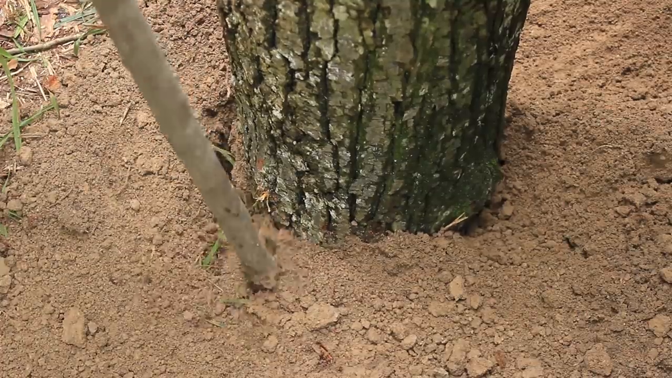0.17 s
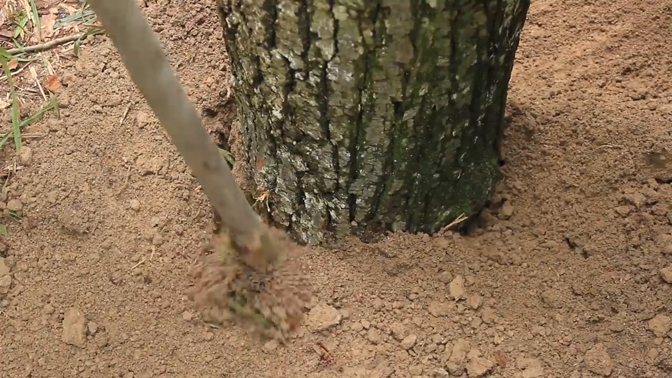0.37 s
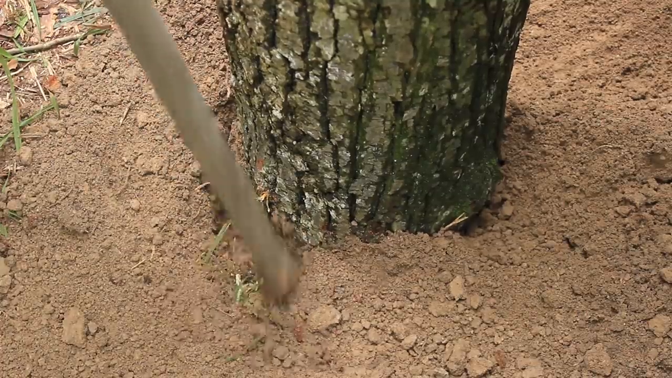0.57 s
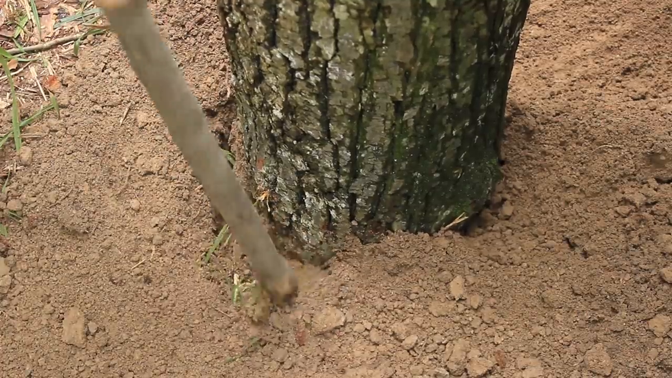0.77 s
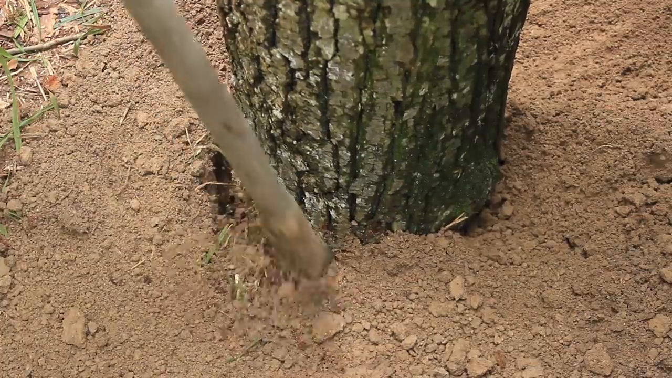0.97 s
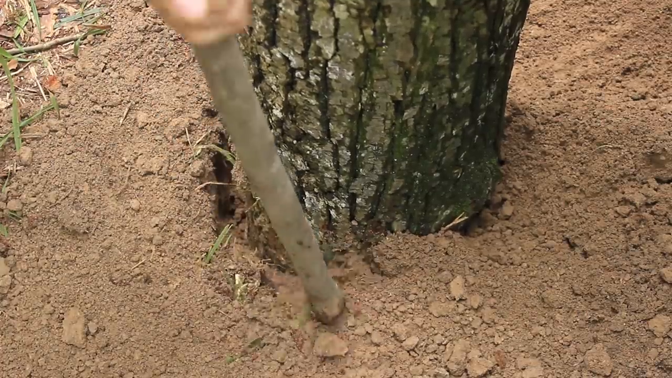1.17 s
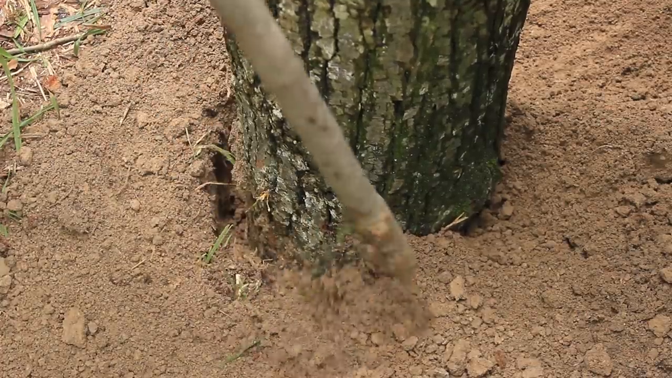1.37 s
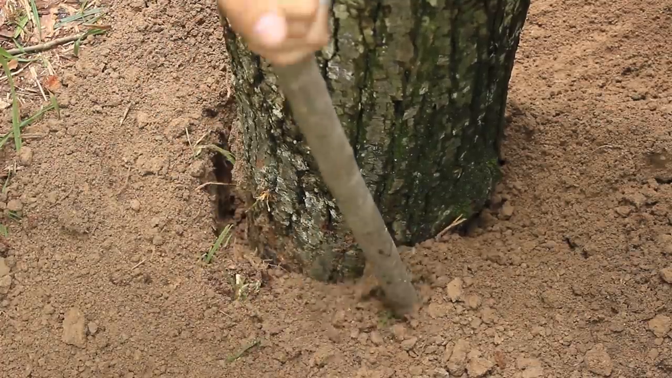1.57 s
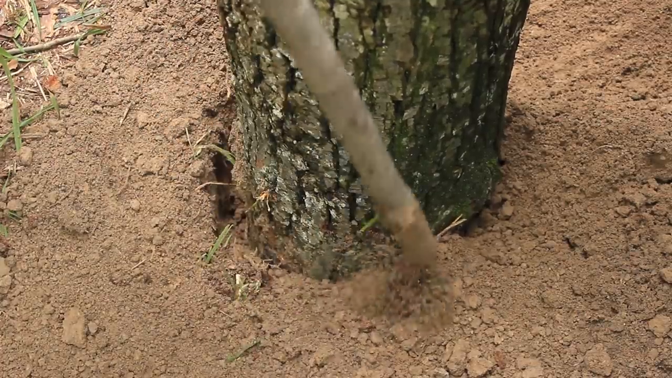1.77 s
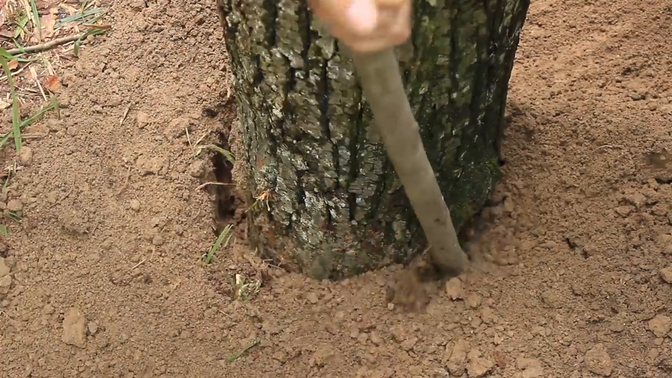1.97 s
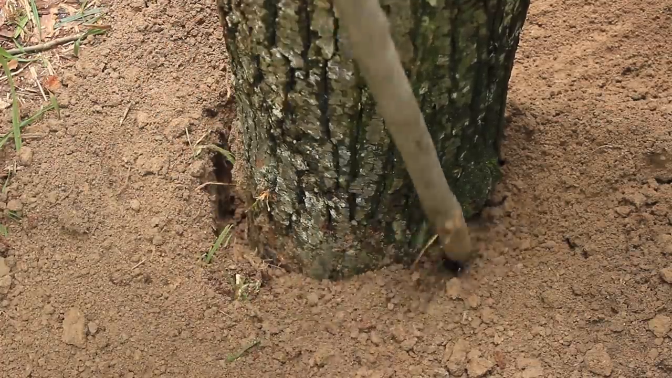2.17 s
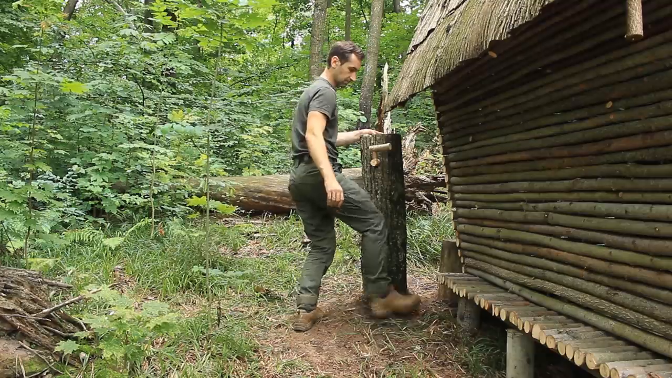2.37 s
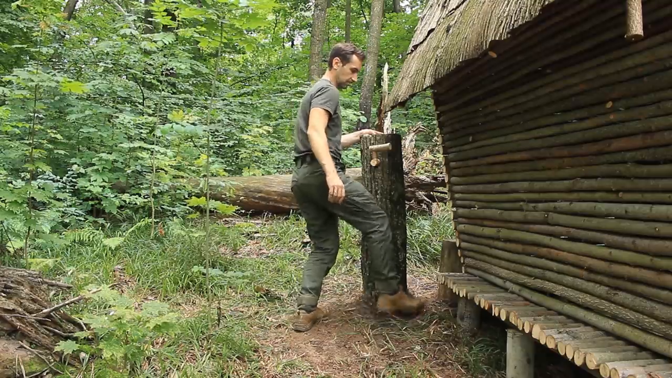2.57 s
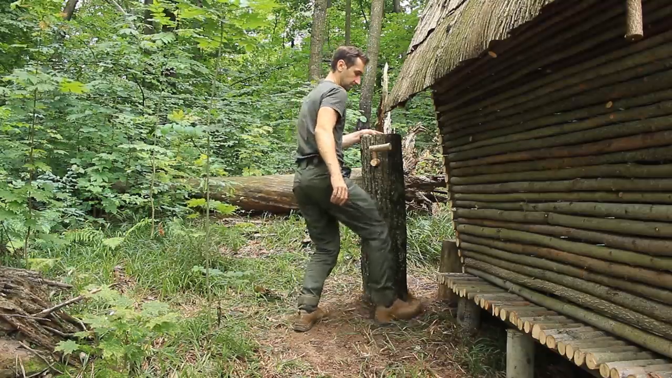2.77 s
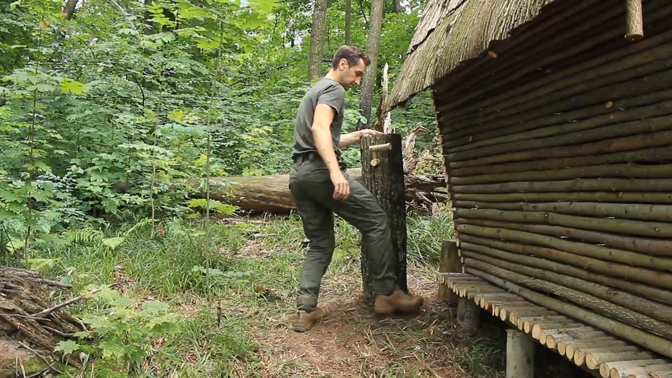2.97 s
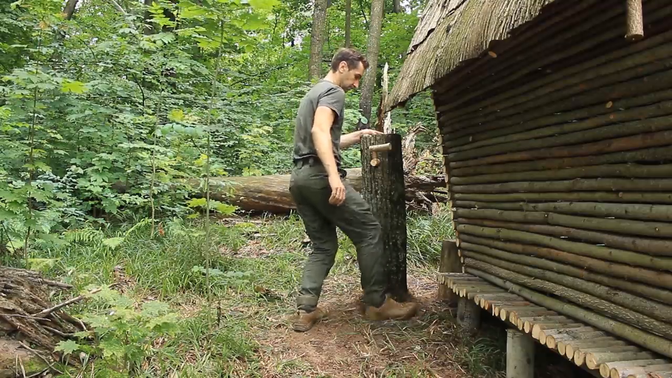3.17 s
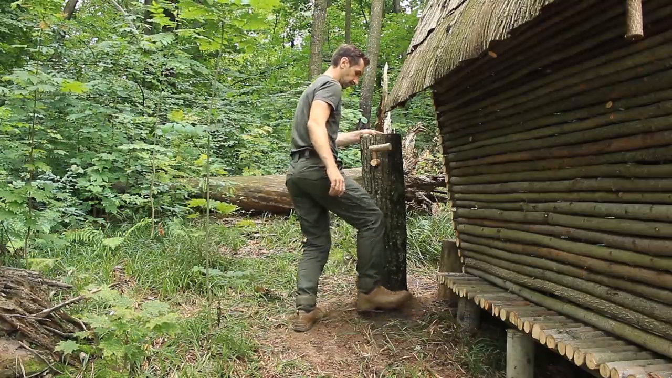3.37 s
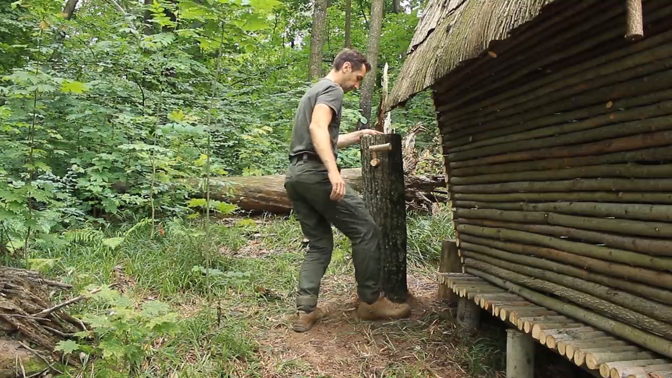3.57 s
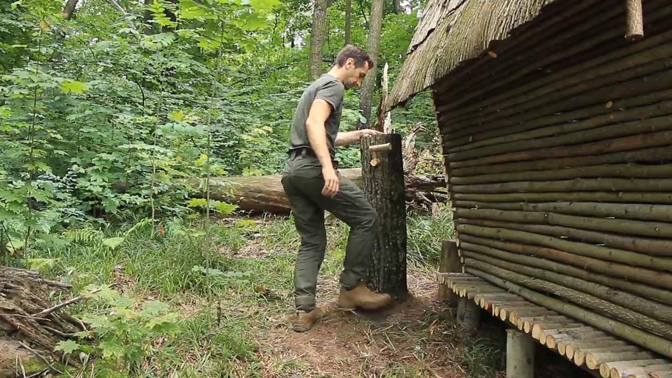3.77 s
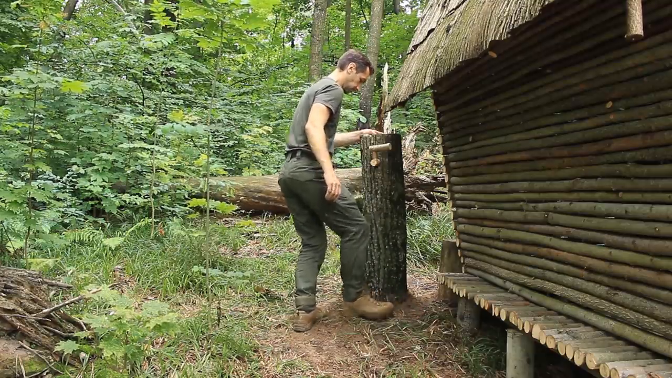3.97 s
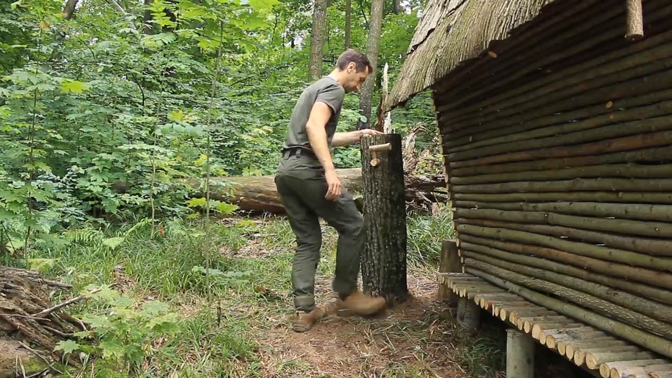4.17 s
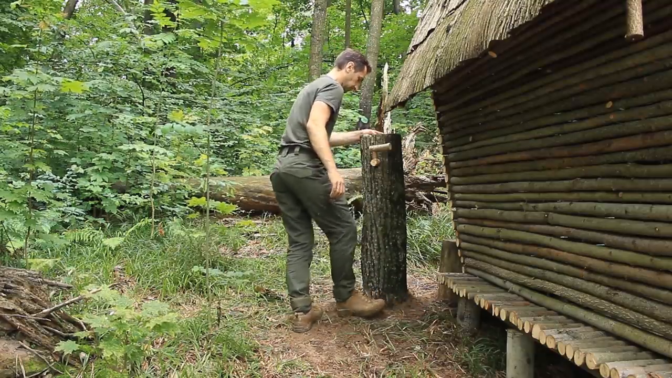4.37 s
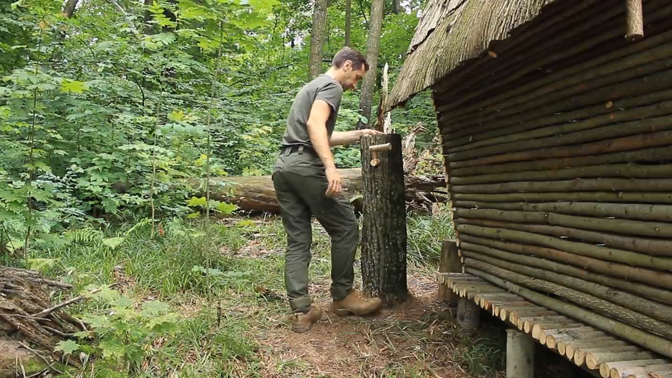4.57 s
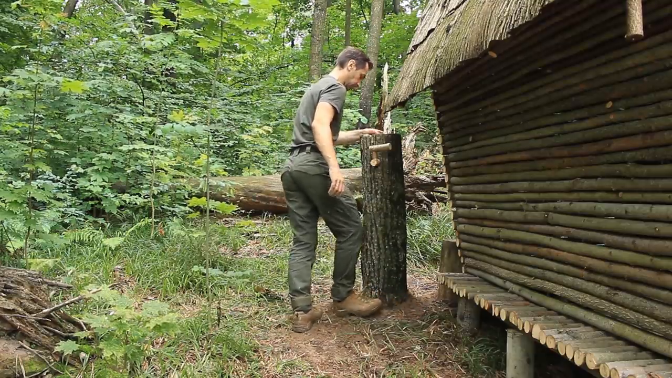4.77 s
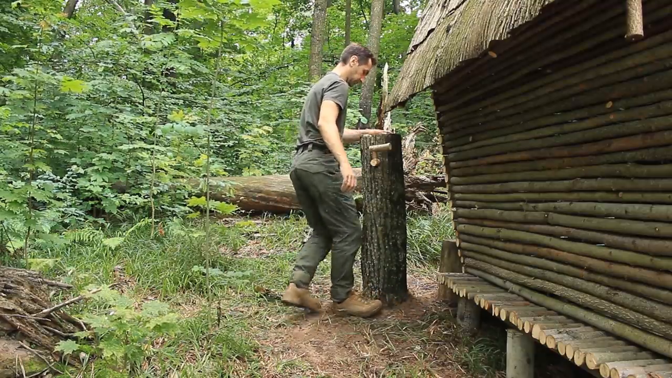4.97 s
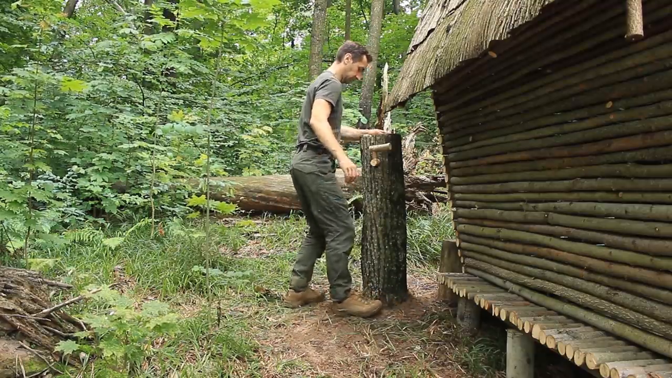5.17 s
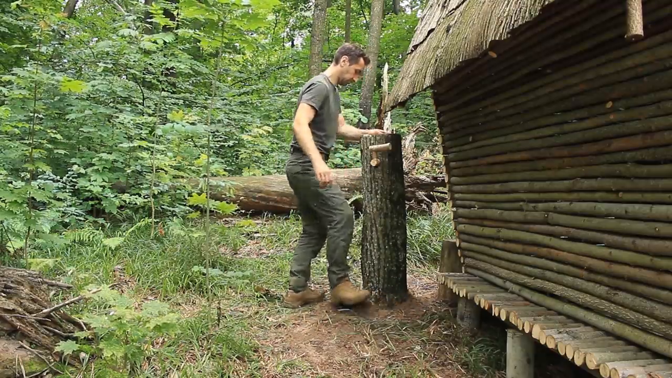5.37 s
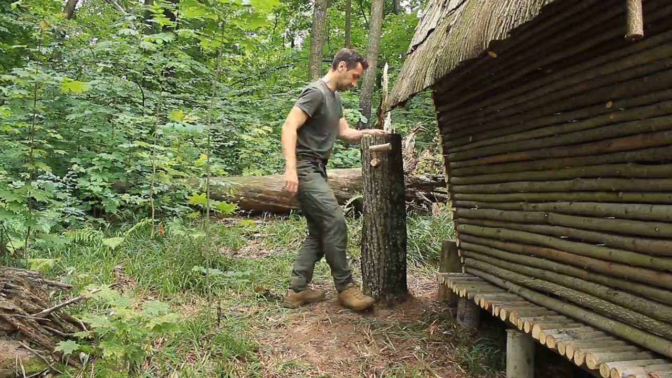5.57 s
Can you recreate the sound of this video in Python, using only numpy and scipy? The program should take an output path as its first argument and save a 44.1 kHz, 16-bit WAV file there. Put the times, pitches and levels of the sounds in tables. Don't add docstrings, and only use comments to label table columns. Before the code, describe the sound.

In a quiet wood, a pole tamps loose earth beside a log, very close: five hollow, gritty knocks, with soil sliding between them. At about 2.3 seconds the view jumps farther back; a boot stamps soil with duller, quieter thuds while a songbird sings a bright trill, falling sweeps and a buzz. Leaves hiss and low wind rumble shakes the single microphone.

```python
import sys
import numpy as np
from scipy import signal
from scipy.io import wavfile
from scipy.ndimage import uniform_filter1d

SR = 44100
rng = np.random.default_rng(int(sys.argv[2]) if len(sys.argv) > 2 else 0)


def linear_from_db(decibels):
    return 10 ** (np.asarray(decibels, float) / 20)


def store_pcm(level_fs):
    pcm = np.round(np.clip(level_fs, -1, 1) * 32767).astype(np.int16)
    wavfile.write(sys.argv[1], SR, np.atleast_2d(pcm).T)


N = 247842

SCENE_CHANGE_S = 2.274

# (frequency [Hz], width [Hz], level [dB])
POLE_MODES = [(508, 55, 3.5), (690, 190, 11), (980, 210, 6), (1300, 72, 6), (1810, 410, 8.5),
              (2506, 92, 1.5), (3400, 310, -16)]


def rms_one(x):
    return x / np.sqrt(np.mean(x ** 2) + 1e-20)


def in_time(rows):
    s, *columns = np.transpose(rows)
    return [np.interp(np.arange(N) / SR, s, column) for column in columns]


def drift(rate_hz):
    r = np.exp(-80 * np.pi * rate_hz / SR)
    white = rng.standard_normal(N // 40 + 2002)
    slow = signal.lfilter([1], [1, -2 * r, r * r], white)[2000:]
    return np.interp(np.arange(N) / 40, np.arange(len(slow)), rms_one(slow))


def add(out, s, sound):
    i = round(s * SR)
    out[i:i + len(sound)] += sound[:N - i]


def band(x, low_hz, high_hz):
    edges_hz = [low_hz, min(high_hz, .45 * SR)]
    return signal.sosfilt(signal.butter(2, edges_hz, "band", fs=SR, output="sos"), x)


def resonate(x, hz, width_hz):
    r = np.exp(-np.pi * width_hz / SR)
    zeros = np.sqrt((1 - r * r) / 2) * np.array([1, 0, -1])
    poles = [1, -2 * r * np.cos(2 * np.pi * hz / SR), r * r]
    return signal.lfilter(zeros, poles, x)


def banded_noise(spectrum, patchy_db):
    hz_points, db_points = np.transpose(spectrum)
    edges_hz = 15 * 2 ** np.arange(0, 10.3, .5)
    white = rng.standard_normal((2, N))
    out = 0
    for k, (low_hz, high_hz) in enumerate(zip(edges_hz, edges_hz[1:])):
        log_centre = np.log(low_hz * high_hz) / 2
        level_db = np.interp(log_centre, np.log(hz_points), db_points, left=-99, right=-99)
        if level_db > -90:
            flicker = linear_from_db(level_db + patchy_db * drift(12.0))
            out = out + flicker * band(white[k % 2], low_hz, high_hz)
    return rms_one(out)


def among_trees(x, t60, wet_db, onset_s):
    t = np.arange(SR) / SR
    tail = rng.standard_normal(SR) * linear_from_db(-60 * t / t60) * (1 - np.exp(-t / onset_s))
    return linear_from_db(wet_db) * signal.fftconvolve(x, tail / np.sqrt(np.sum(tail ** 2)))[:N]


def tamping(hits, modes, thud_hz, grit_hz, thud_db, uneven_db, gain_db, rise_share):
    thud_loss_db_per_octave = 4.5
    grit_lag = 2.6
    skirt = 8.9
    out = np.zeros(N)
    t = np.arange(SR // 4) / SR
    for s, peak_db, high_db, ring_hz, t60 in hits:
        rise_s = rise_share * t60
        low_db = thud_db - thud_loss_db_per_octave * np.log2(ring_hz / 1000)
        pressure = np.minimum(t / rise_s, 1) ** 2 * linear_from_db(-60 * np.maximum(t - rise_s, 0) / t60)
        fine = rng.standard_normal(len(t)) * pressure
        spray = fine * np.minimum(t / (grit_lag * rise_s), 1)
        coarse = fine * linear_from_db(uneven_db * np.minimum(rng.exponential(1, len(t)), 4))

        strengths_db = rng.normal(0, 2.5, len(modes))
        body = linear_from_db(12.0) * resonate(coarse, ring_hz, 0.25 * ring_hz)
        for (hz, width_hz, db), strength_db in zip(modes, strengths_db):
            body = body + linear_from_db(db + strength_db) * resonate(coarse, hz, width_hz)
        body = band(body, 245, min(skirt * ring_hz, 6750))
        thud = band(coarse, *thud_hz)
        grit = band(spray, *grit_hz)
        body, thud, grit = [v / np.max(np.abs(v)) for v in (body, thud, grit)]
        add(out, s, linear_from_db(peak_db + gain_db) * (body + linear_from_db(low_db) * thud + linear_from_db(high_db) * grit))
    return out


def pole_blows():
    # (time [s], peak [dB], grit re body [dB], loudest ring [Hz], t60 [s])
    pole_hits = [(.228, -29, -20, 1050, 0.17), (.250, -18, -18.5, 3400, 0.053),
                 (.259, -21, -26, 1300, 0.029), (.266, -25.5, -10, 800, 0.035),
                 (.662, -29, -19, 2400, 0.061), (.668, -23, -26, 530, 0.047), (.677, -24, -23, 2400, 0.031),
                 (.682, -17.5, -12, 1300, 0.044), (.691, -14.5, -35, 1300, 0.048),
                 (.709, -39, -2, 3380, 0.043), (1.116, -33.5, -23, 1190, 0.072),
                 (1.128, -29, -22, 695, 0.062), (1.144, -25, -24, 2500, 0.046),
                 (1.146, -29, -14, 570, 0.059), (1.535, -32, -41, 2320, 0.025),
                 (1.545, -34, -17, 1230, 0.082), (1.558, -30, -27.5, 1280, 0.066),
                 (1.573, -29.5, -21, 2680, 0.055), (1.972, -27, -15, 2450, 0.036),
                 (1.981, -29, -10.5, 1030, 0.044), (1.997, -22, -18, 980, 0.087),
                 (2.003, -23.5, -22, 800, 0.048), (2.010, -39, -25, 830, 0.076),
                 (2.017, -24, -24, 2500, 0.037)]
    return tamping(pole_hits, POLE_MODES, (210, 580), (3800, 11000),
                   thud_db=-8.5, uneven_db=4.5, gain_db=2.5, rise_share=0.0736)


def crunches():
    # (time [s], hold [s], peak [dB], loudest ring [Hz], grit re body [dB])
    clods = [(0.2505, 0.0073, -27.5, 3300, -23), (0.2572, 0.011, -19.5, 1300, -32),
             (0.658, 0.0065, -37, 2400, -22), (0.6715, 0.0044, -10, 2330, -27),
             (0.703, .007, -25, 3600, -3), (0.856, .004, -42, 2600, -2), (1.107, 0.0065, -29, 2680, -26),
             (1.1396, 0.0042, -10, 1880, -30), (1.534, 0.0044, -26, 2300, -27),
             (1.9677, 0.0026, -33.5, 2500, -12), (4.287, 0.0025, -25, 3200, -1)]
    release_s, uneven_db = 0.0086, 2
    ring_share = 0.23
    dust_db = -13
    out = np.zeros(N)
    t = np.arange(SR // 20) / SR
    for s, hold_s, peak_db, ring_hz, high_db in clods:
        pressure = np.minimum(t / .0007, 1) * linear_from_db(-60 * np.maximum(t - hold_s, 0) / release_s)
        grains = rng.standard_normal(len(t)) * pressure
        grains = grains * linear_from_db(uneven_db * np.minimum(rng.exponential(1, len(t)), 3))
        body = resonate(grains, ring_hz, ring_share * ring_hz)
        body = body + linear_from_db(-20.5) * resonate(grains, 1.4 * ring_hz, 600)
        body = body + linear_from_db(-8) * resonate(grains, 0.51 * ring_hz, 300)
        grit = band(grains, 4000, 7100) + linear_from_db(dust_db) * grains
        body, grit = [v / np.max(np.abs(v)) for v in (body, grit)]
        add(out, s, linear_from_db(peak_db) * (body + linear_from_db(high_db) * grit))
    return out


def pushes():
    # (time [s], peak [dB], frequency [Hz])
    landings = [
        (0.6723, -11.5, 510),
        (.683, -20, 526),
        (1.141, -15, 520),
        (1.148, -26, 282),
        (2.507, -25, 285),
        (3.246, -39, 304),
        (4.273, -24.5, 256),
        (5.594, -32, 297),
    ]
    cycles = 9.9
    out = np.zeros(N)
    t = np.arange(SR // 20) / SR
    for s, peak_db, hz in landings:
        add(out, s, linear_from_db(peak_db - 60 * t * hz / cycles) * np.sin(2 * np.pi * hz * t))
    return out


def soil_scuffs():
    # (time [s], peak [dB], grit re body [dB], loudest ring [Hz], t60 [s])
    slides = [
        (.29, -41, -24, 2800, 0.11),
        (.378, -34, -20, 2200, 0.18),
        (.825, -37, -17, 2560, 0.19),
        (1.255, -36.5, -24, 2200, 0.19),
        (1.42, -58, 11, 3500, 0.16),
        (1.70, -36.5, -12, 2430, 0.19),
        (2.16, -35.5, -33, 2200, 0.25),
        (2.905, -57.5, 9, 3900, 0.16),
    ]
    return tamping(slides, POLE_MODES, (150, 650), (3800, 15000),
                   thud_db=-5., uneven_db=2.5, gain_db=1.5, rise_share=.14)


def boot_stamps():
    # (time [s], peak [dB], grit re body [dB], loudest ring [Hz], t60 [s])
    boot_hits = [(2.512, -31, -32, 473, 0.056), (2.529, -44, -32, 417, 0.2), (2.877, -36, -34, 304, 0.11),
                 (2.904, -40.5, -26, 377, 0.07), (3.245, -32, -30, 440, 0.081), (3.273, -41, -30, 615, .14),
                 (3.309, -37, -23, 1500, 0.019), (3.570, -33, -24, 450, 0.077),
                 (3.577, -22.5, -24.5, 537, 0.13), (3.592, -23, -28, 490, 0.029),
                 (3.601, -36, -32, 920, 0.078), (3.917, -34.5, -32, 345, 0.083),
                 (3.925, -28, -16, 918, 0.049), (3.939, -38.5, -38, 480, 0.16),
                 (3.963, -32.5, -15, 2200, 0.03), (4.277, -32, -30, 507, 0.038),
                 (4.283, -21, -49, 430, 0.066), (4.289, -28, -8, 3120, 0.029),
                 (4.294, -36.5, -19, 288, 0.17), (4.317, -32, -22, 2050, 0.066),
                 (5.229, -37, -40, 410, 0.042), (5.244, -36.5, -26, 750, 0.049),
                 (5.592, -34, -14, 465, 0.12), (5.607, -27, -15.5, 476, 0.063)]
    # (frequency [Hz], width [Hz], level [dB])
    boot_modes = [(450, 140, 12.5), (800, 200, 1.5), (1240, 1500, -40), (2200, 5500, 2.5)]
    return tamping(boot_hits, boot_modes, (190, 480), (2500, 14000),
                   thud_db=-8.5, uneven_db=3.5, gain_db=3.5, rise_share=0.05)


def whistle(rows, warble_hz, fade_s):
    flutter_hz = 55
    throb_per_hz = 0.00094
    throb_phase_rad = 4.3
    s, hz, db, depth_hz = np.transpose(rows)
    t = np.arange(s[0], s[-1], 1 / SR)
    base_hz, depth_hz = np.interp(t, s, hz), np.interp(t, s, depth_hz)
    warble_rad = 2 * np.pi * warble_hz * (t - s[0])
    shaky = uniform_filter1d(rng.standard_normal(SR // 4), size=90)[:len(t)]
    pitch_hz = base_hz + depth_hz * np.sin(warble_rad) + flutter_hz * rms_one(shaky)
    ends = np.clip(np.minimum(t - s[0], s[-1] - t) / fade_s, 0, 1)
    throb = 1 + np.minimum(throb_per_hz * depth_hz, .9) * np.cos(warble_rad + throb_phase_rad)
    tone = np.sin(2 * np.pi * np.cumsum(pitch_hz) / SR)
    return ends * throb * linear_from_db(np.interp(t, s, db)) * tone, t, base_hz


def songbird():
    # (time from mark [s], pitch [Hz], level [dB], warble depth [Hz])
    trill = [(-.032, 6460, -22, 200), (-.026, 5580, -4, 202), (-.018, 4300, 1, 204), (-.008, 3008, -9, 4),
             (0, 2887, -11.5, 65), (.010, 2843, -26, 8), (.018, 4250, 4, 0), (.024, 5080, -7, 0),
             (.030, 5250, -4, 0)]
    sweep = [(-.046, 5190, -17, 0), (-.038, 5050, -13.5, 0), (-.026, 4040, -6, 0), (-.014, 6500, -26, 0),
             (-.006, 4350, -14, 0), (.003, 3707, -5, 0), (.025, 2800, -8, 0), (.041, 2255, -12, 0.0022),
             (.054, 2040, -23, 0)]
    turn = [(0, 5390, -22, 100), (.012, 6900, -25, 196), (.022, 5800, -17.5, 300), (.034, 4900, -15.5, 200),
            (.046, 6900, -30, 300), (.07, 7960, -24, 302), (.085, 6600, -18.5, 200), (.101, 5200, -14, 200),
            (.112, 4380, -29, 100)]
    dip = [(0, 3700, -11, 450), (.020, 3900, -3, 250), (.032, 3600, -1, 0), (.047, 2600, -4, 0),
           (.062, 1850, -13, 0), (.078, 2550, -5, 0), (.094, 3450, 0, 0), (.103, 2700, -3, 0),
           (.113, 1700, -18, 0)]
    buzz = [(0, 4340, -14.5, 800), (.04, 4400, -14.5, 646), (.08, 3540, -8, 590), (.105, 3148, -7, 590),
            (.135, 2615, -8.5, 493), (.17, 2250, -16.5, 450), (.21, 2120, -22, 400), (.235, 1980, -36, 400)]
    trill_beat_s = .0765
    # (mark [s], level [dB])
    song = [(trill, (-0.012, -21, 0), [(2.226 + trill_beat_s * beat, -35) for beat in range(6)]),
            (sweep, (-0.018, -13.5, 0), [(2.712, -26), (2.862, -24), (3.008, -22.5), (3.150, -22.5)]),
            (turn, (0.021, -11, -7), [(3.258, -18)]),
            (dip, (0.026, -1.1, 0), [(3.41, -27.5)]),
            (buzz, (0.02, -18, -1.7), [(3.59, -22.5)])]
    beak_opens_s = 0.012
    ground_comb_hz, ground_echo_db = 233.4, -5
    sung, direct = np.zeros((2, N))
    for syllable, (opens_s, shut_db, open_db), marks in song:
        opening_s = [opens_s - beak_opens_s / 2, opens_s + beak_opens_s / 2]
        for s, db in marks:
            tone, t, _ = whistle(syllable, warble_hz=56.5, fade_s=0.00085)
            beak_db = np.interp(t, opening_s, [shut_db, open_db])
            add(sung, s + t[0], linear_from_db(db) * tone)
            add(direct, s + t[0], linear_from_db(db + beak_db) * tone)
    lag = round(SR / ground_comb_hz)
    direct[lag:] -= linear_from_db(ground_echo_db) * direct[:-lag].copy()
    near_leaves = among_trees(sung, t60=0.13, wet_db=-6.0, onset_s=0.00095)
    far_trunks = among_trees(sung, t60=0.78, wet_db=-3.0, onset_s=0.0077)
    heard = direct + near_leaves + far_trunks
    return heard * (np.arange(N) >= SCENE_CHANGE_S * SR)


def far_birds():
    # (time [s], length [s], upper voice [Hz], level [dB], warble depth [Hz])
    thin_calls = [
        (0.076, 0.22, 7940, -68.5, 77),
        (1.531, 0.097, 7900, -57.5, 440),
        (2.212, 0.062, 8030, -64, 400),
        (2.877, 0.056, 7600, -54.5, 210),
        (3.56, 0.065, 7560, -53.5, 120),
        (4.191, .11, 7860, -51.5, 420),
        (4.505, 0.063, 7380, -60.5, 100),
        (5.193, .11, 7780, -51, 423),
    ]
    # (time [s], length [s], from [Hz], to [Hz], level [dB])
    chips = [(1.417, 0.028, 7650, 8460, -59), (1.653, .035, 5090, 5100, -60),
             (1.945, 0.038, 6520, 8370, -53.5), (2.158, 0.057, 6820, 8450, -52.5),
             (2.537, 0.0082, 7000, 7850, -48), (2.552, 0.015, 7550, 7950, -47),
             (2.539, 0.031, 8670, 9200, -59), (2.76, 0.017, 7570, 8900, -56.5),
             (4.54, 0.031, 8600, 9300, -66), (4.904, 0.025, 7400, 9150, -61),
             (5.113, 0.024, 9400, 6500, -54), (5.264, 0.019, 2100, 1930, -51),
             (5.36, 0.023, 8550, 9100, -60), (5.411, 0.011, 3420, 4900, -49.5),
             (5.416, 0.042, 4610, 4600, -62)]
    # (time [s], length [s], from [Hz], to [Hz], level [dB])
    fluting = [
        (0.092, 0.086, 2200, 2350, -53.5),
        (0.126, 0.13, 2440, 3100, -48.5),
        (0.302, 0.054, 3050, 3100, -55),
        (1.388, 0.095, 2980, 3325, -54.5),
        (1.485, 0.13, 3334, 2850, -52.5),
        (4.498, 0.042, 2530, 2560, -58),
        (4.669, 0.17, 2470, 2940, -61.5),
        (4.777, 0.23, 2970, 2943, -59),
        (5.213, 0.14, 2730, 2730, -59),
    ]
    thin_sag, lower_voice, lower_sag, lower_db, lower_warble = .92, .835, 0.99, -4, 0.18
    chip_warble_hz, flute_warble_hz = 45, (170, 80)
    fade_max_s, direct_db = 0.008, -14

    calls = [(*chip, chip_warble_hz) for chip in chips]
    calls += [(*note, flute_warble_hz[int(note[0] > SCENE_CHANGE_S)]) for note in fluting]
    for s, length_s, hz, db, depth_hz in thin_calls:
        low_hz = lower_voice * hz
        calls.append((s, length_s, hz, thin_sag * hz, db, depth_hz))
        calls.append((s, length_s, low_hz, lower_sag * low_hz, db + lower_db, lower_warble * depth_hz))

    scenes = np.zeros((2, N))
    for s, length_s, from_hz, to_hz, db, depth_hz in calls:
        rows = [(0, from_hz, db, depth_hz), (length_s, to_hz, db, depth_hz)]
        tone, _, _ = whistle(rows, warble_hz=69.56, fade_s=min(fade_max_s, length_s / 4))
        add(scenes[int(s > SCENE_CHANGE_S)], s, tone)

    heard = []
    for x in scenes:
        near_leaves = among_trees(x, t60=0.12, wet_db=2.0, onset_s=0.0012)
        far_trunks = among_trees(x, t60=0.81, wet_db=3.0, onset_s=0.0098)
        heard.append(linear_from_db(direct_db) * x + near_leaves + far_trunks)
    return np.where(np.arange(N) < SCENE_CHANGE_S * SR, heard[0], heard[1])


def woodland_air():
    # (time [s], level [dB])
    woods = [(0.0, -51.5), (0.38, -50), (0.85, -51.5), (1.72, -51), (2.1, -50), (2.28, -53), (3.47, -52.5),
             (4.79, -53.5), (5.62, -52.5)]
    # (frequency [Hz], level per Hz [dB])
    murmur = [(59, -22), (100, 3.5), (1800, -9), (2340, -45), (3960, -120)]
    leaves = [(900, -17), (1500, -9), (2300, 2), (3300, 1.5), (5000, -3.5), (8000, -6), (12000, -20),
              (17000, 30)]
    breeze_db, = in_time(woods)
    hiss = banded_noise(leaves, patchy_db=.4)
    return linear_from_db(breeze_db) * (banded_noise(murmur, patchy_db=1.45) + linear_from_db(-2.5) * hiss)


def bumps(rows):
    t = np.arange(N) / SR
    return sum(linear_from_db(db) * np.exp(-.5 * ((t - s) / width_s) ** 2) for s, db, width_s in rows)


def microphone_rumble():
    # (time [s], level [dB])
    draught_curve = [(0, -70), (.35, -66), (.6, -98), (2.1, -50), (2.7, -50.5), (3.1, -64), (3.7, -53.5),
                     (4.5, -51.5), (5.4, -44), (5.62, -51.5)]
    # (time [s], peak [dB], half width [s])
    gust_bumps = [(.8, -40, 0.027), (.85, -37.5, 0.015), (.95, -49, 0.034), (1.16, -37.5, 0.029),
                  (1.34, -35, 0.032), (1.47, -30.5, 0.021), (1.51, -46, 0.056), (1.66, -46.5, 0.019),
                  (1.78, -49, 0.016), (2.08, -50, 0.02)]
    # (time [s], peak [dB])
    stand_jolts = [
        (.26, -41),
        (2.02, -43.5),
        (2.5, -63),
        (2.9, -44),
        (3.26, -46.5),
        (3.6, -43.5),
        (3.93, -43),
        (4.3, -67),
    ]
    # (frequency [Hz], level per Hz [dB])
    gust_colour = [(29, -50), (50, -2), (107, 0), (177, -14), (268, -28), (350, -12), (460, -62),
                   (770, -120)]
    jolt_s = 0.022
    draught_deep_db, gust_deep_db, jolt_deep_db = -31, -4.5, -9
    draught = linear_from_db(in_time(draught_curve)[0])
    gusts = bumps(gust_bumps)
    jolts = bumps([(s, db, jolt_s) for s, db in stand_jolts])
    deep = linear_from_db(draught_deep_db) * draught + linear_from_db(gust_deep_db) * gusts + linear_from_db(jolt_deep_db) * jolts
    rumble = linear_from_db(-4.0) * (draught + gusts + jolts) * banded_noise(gust_colour, patchy_db=1.0)
    return rumble + deep * rms_one(band(rng.standard_normal(N), 32, 56.0))


def scene():
    pole, boot = pole_blows(), boot_stamps()
    scattered = among_trees(pole + boot, t60=0.18, wet_db=-19.5, onset_s=0.0082)
    work = pole + crunches() + pushes() + soil_scuffs() + boot + scattered
    birds = songbird() + far_birds()
    return np.tile(work + birds + woodland_air() + microphone_rumble(), (2, 1))


def top_cut(x):
    return signal.sosfilt(signal.butter(12, 16640, fs=SR, output="sos"), x)


def record(dry):
    cutoff_hz, offset = 15850, .001
    low_pass = signal.cheby2(14, 70, cutoff_hz + 750, fs=SR, output="sos")
    mix = signal.sosfilt(low_pass, dry) + offset
    return top_cut(mix)


dry = scene()
out = record(dry)
store_pcm(out)
```